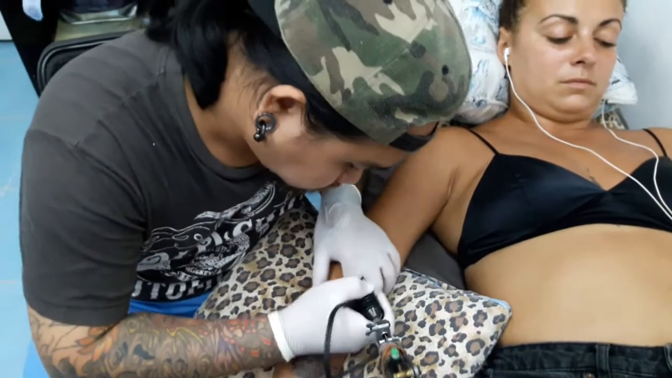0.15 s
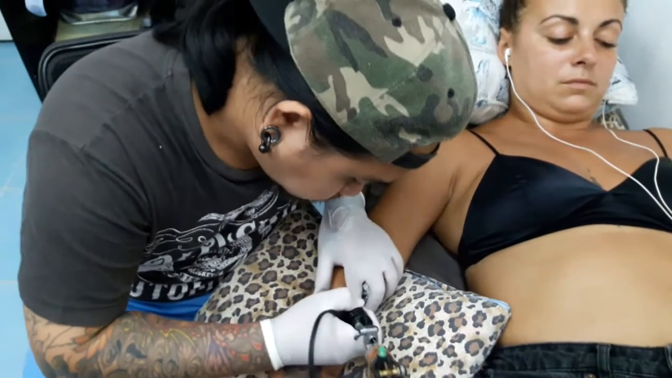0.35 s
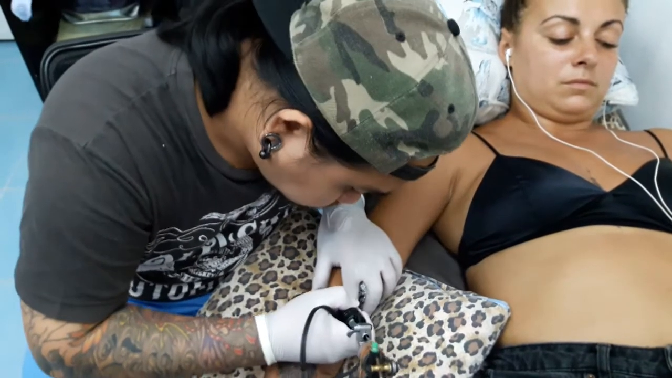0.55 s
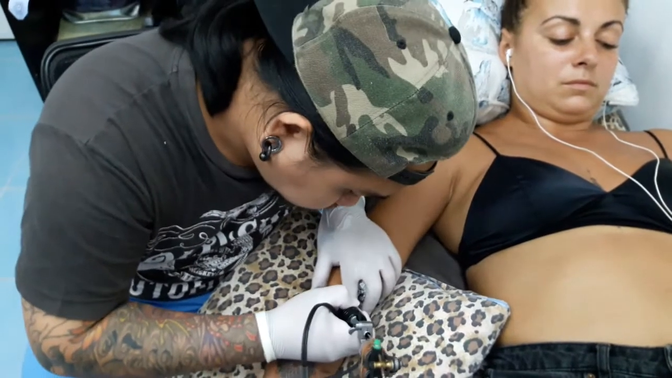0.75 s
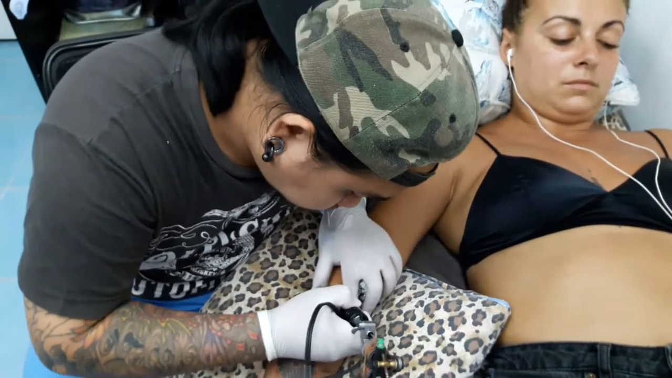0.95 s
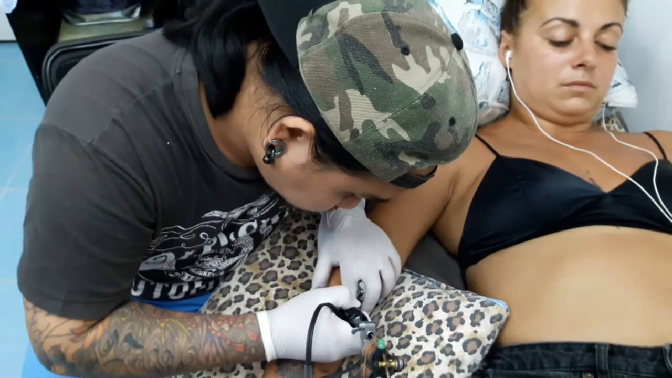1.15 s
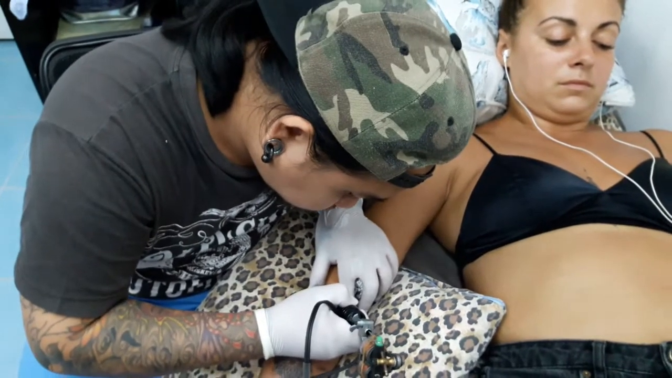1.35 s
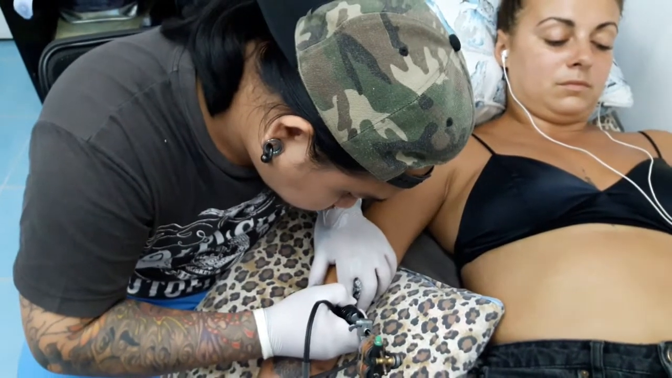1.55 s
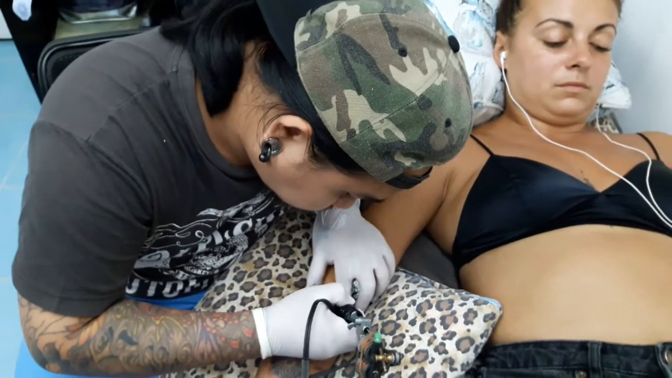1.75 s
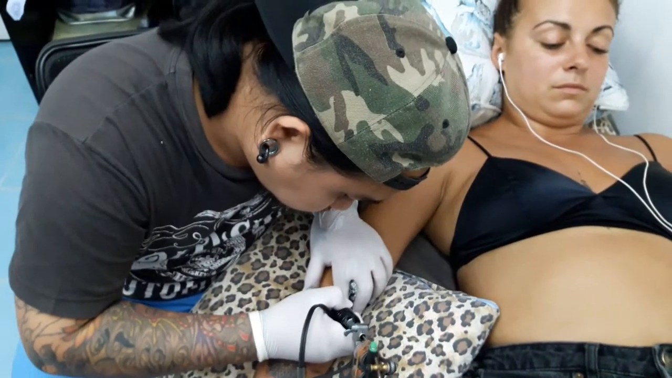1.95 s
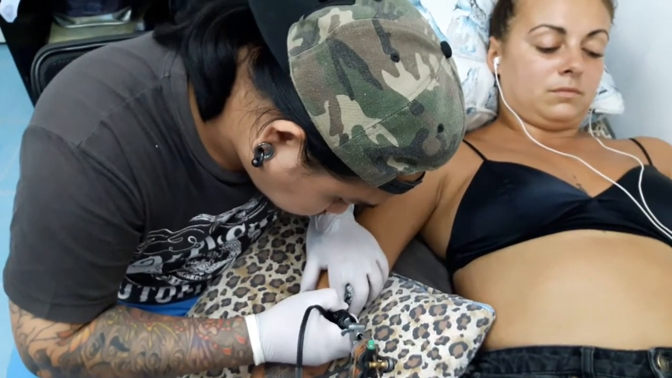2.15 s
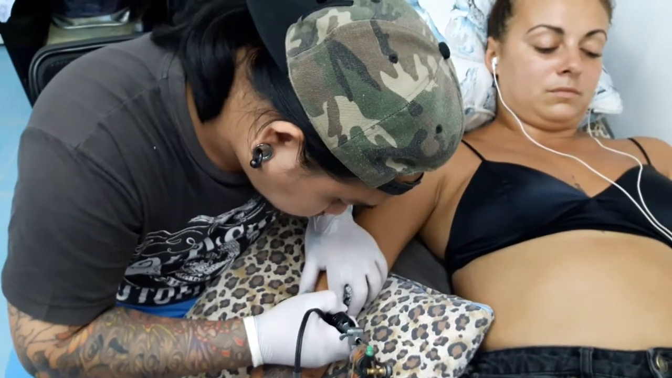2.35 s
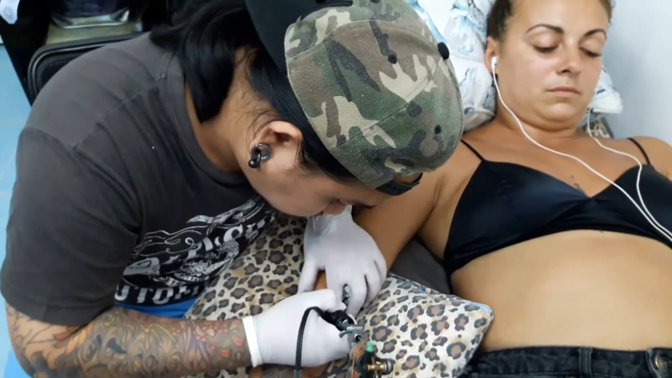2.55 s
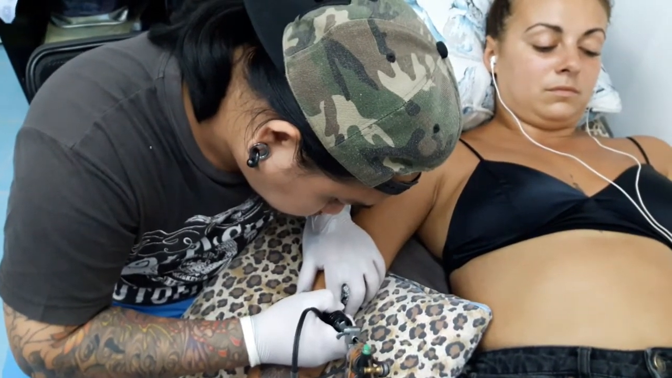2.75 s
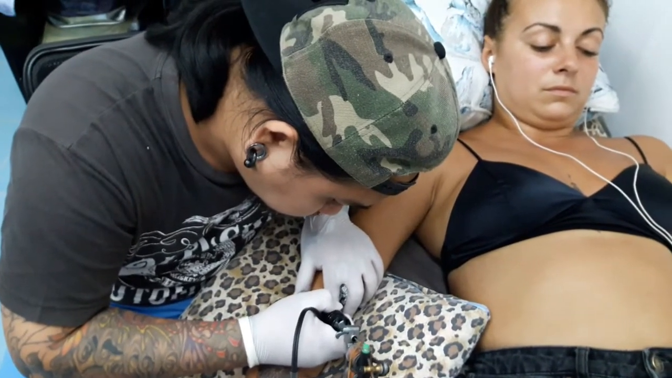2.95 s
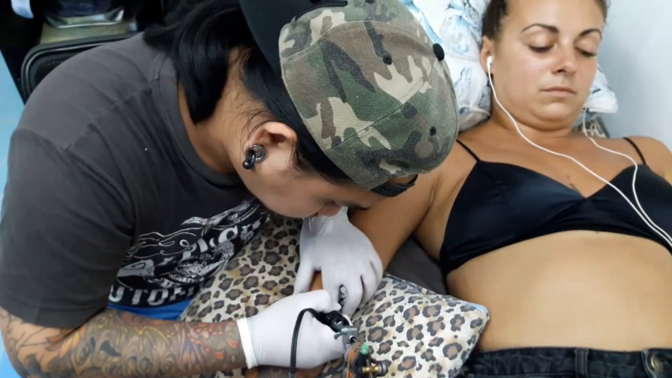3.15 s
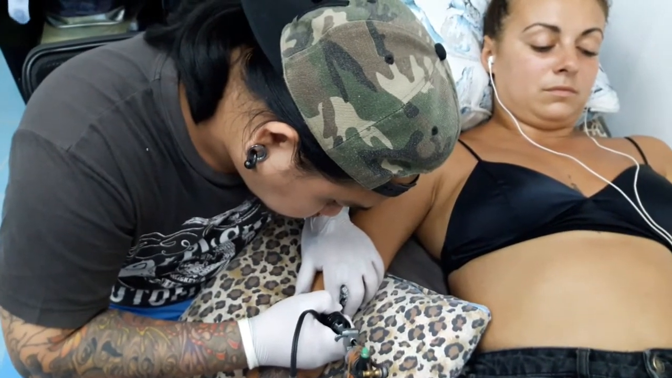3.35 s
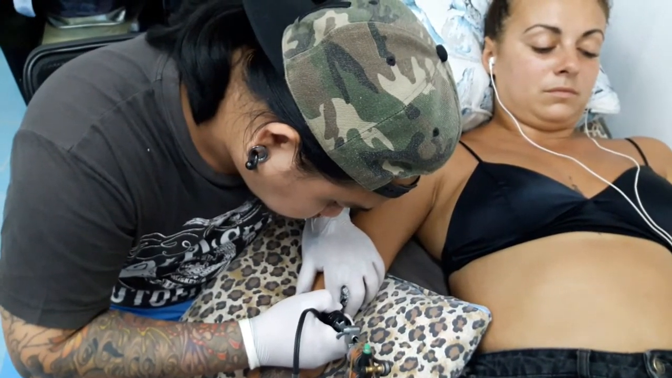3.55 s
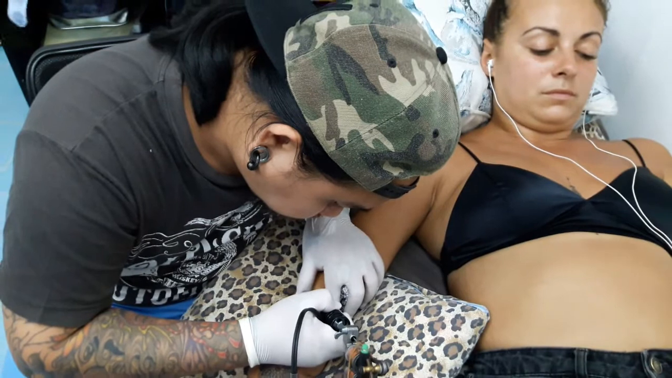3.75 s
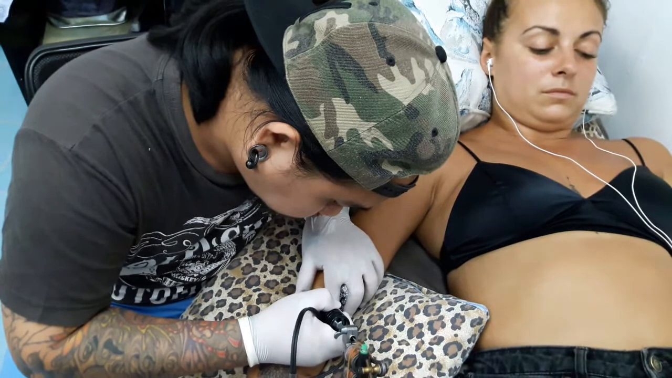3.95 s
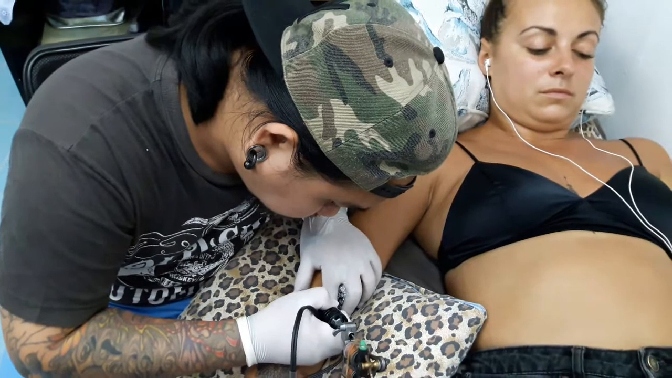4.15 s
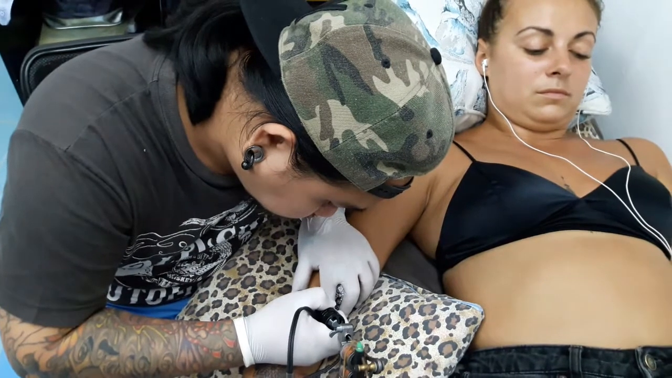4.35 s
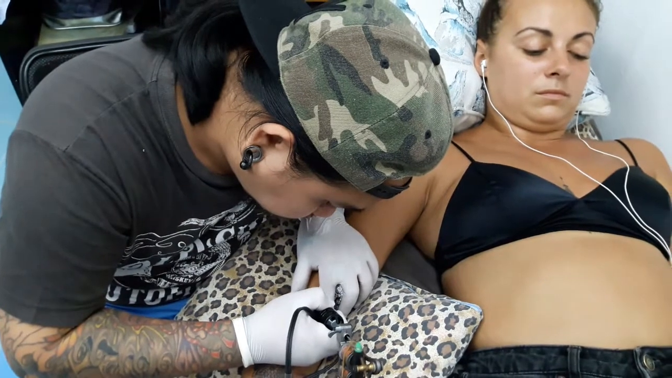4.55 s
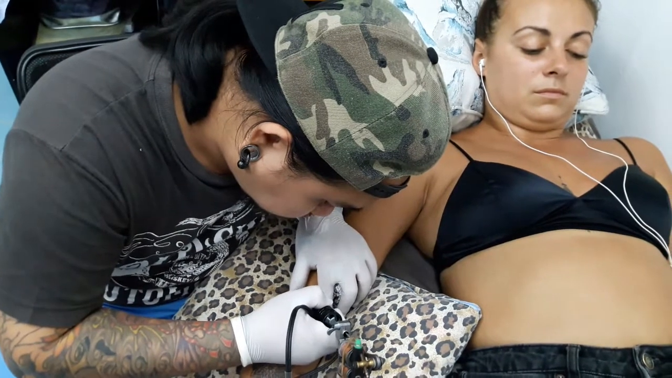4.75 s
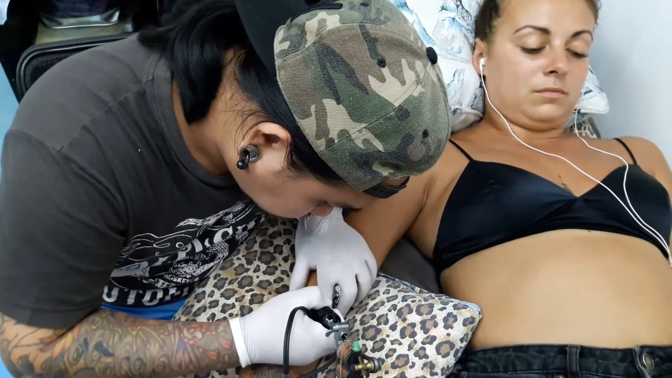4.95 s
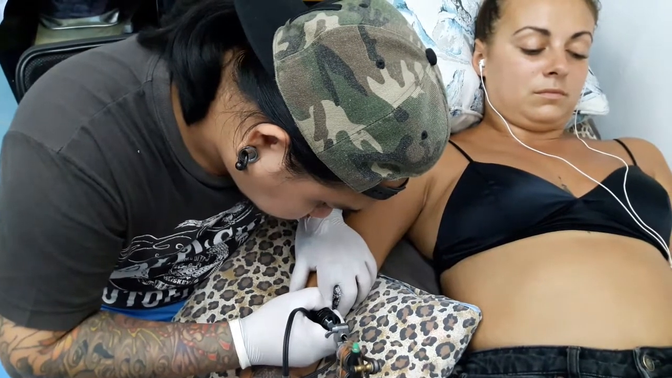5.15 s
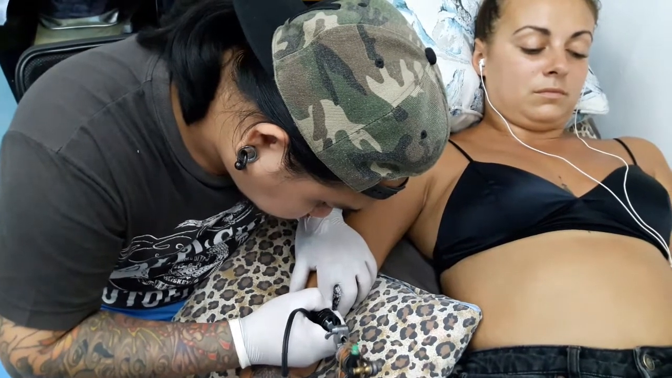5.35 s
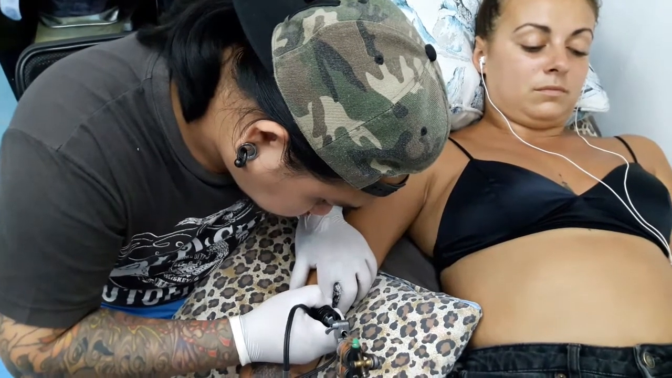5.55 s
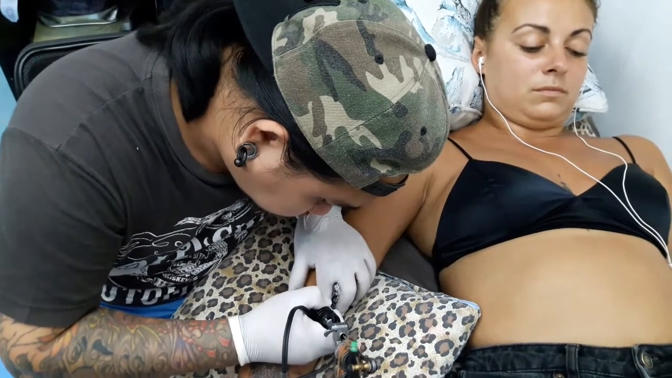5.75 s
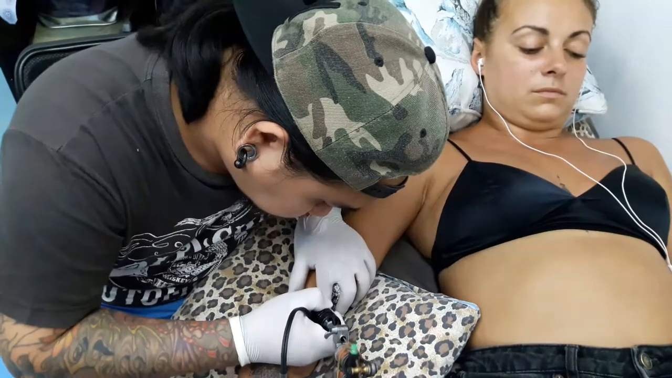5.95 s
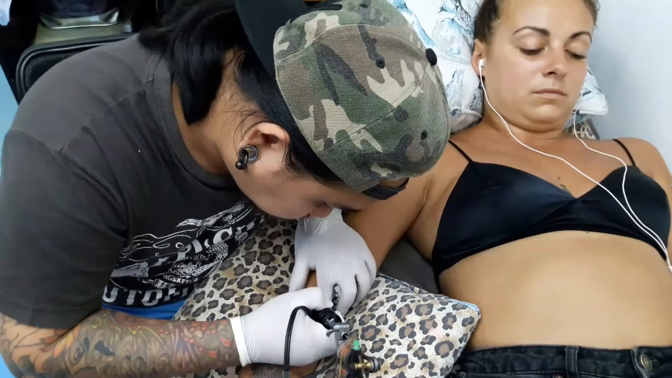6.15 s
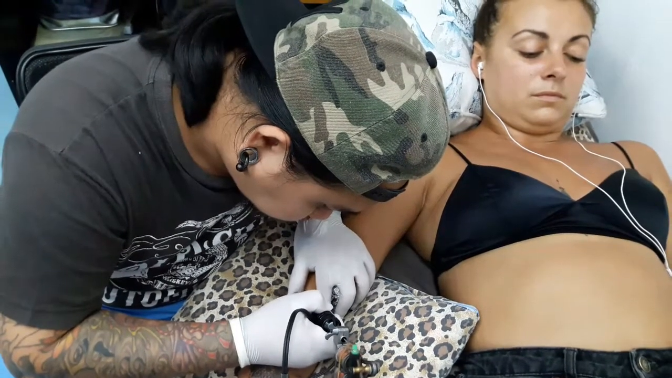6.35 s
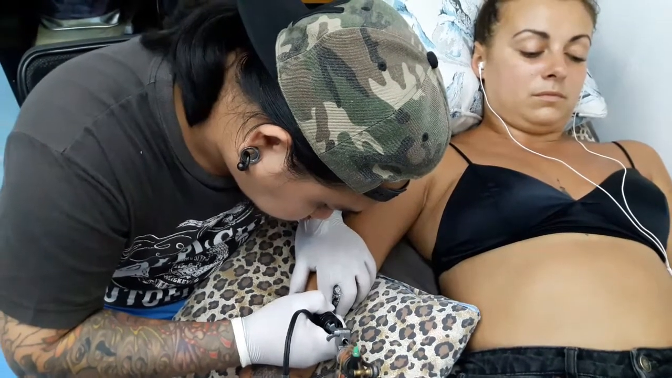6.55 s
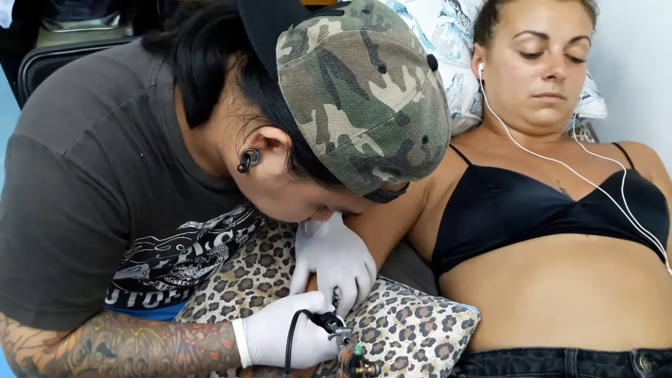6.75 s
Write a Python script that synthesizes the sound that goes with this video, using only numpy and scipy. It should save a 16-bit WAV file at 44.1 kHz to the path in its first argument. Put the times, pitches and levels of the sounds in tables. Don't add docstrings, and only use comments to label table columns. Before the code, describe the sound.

Quiet room air with a low fan first, then an abrupt start: a close tattoo machine, its rapid metal slaps fused into a dry, sizzling buzz with a very strong high edge. The pitch stays nearly level, sagging and recovering minutely while the timbre wavers. A few light rustles and clicks of glove or wrap come through. Small recorder sound, slightly gritty and thin, with short room reflections.

```python
import sys
import numpy as np
from scipy import signal
from scipy.fft import rfft, irfft
from scipy.io import wavfile
from scipy.ndimage import uniform_filter1d

SR = 44100
rng = np.random.default_rng(int(sys.argv[2]) if len(sys.argv) > 2 else 0)


def transcribe(signal):
    frames = np.atleast_2d(signal).T
    limited = np.clip(frames, -1, 1)
    pcm = np.round(limited * 32767).astype(np.int16)
    wavfile.write(sys.argv[1], SR, pcm)


def natural_amplitude(level_db):
    exponent = np.asarray(level_db, float) / 20
    return 10 ** exponent


N = 299880

# time in seconds, rate in strokes per second.
SPEED = [(.3147, 114.74), (.778, 114.73), (.977, 113.92), (1.47, 113.4), (1.825, 114.15), (2.408, 112.33),
         (2.586, 114.11), (2.888, 113.95), (3.7, 113.39), (3.742, 114.43), (4.403, 115.07), (4.579, 113.43),
         (4.695, 114.5), (5.441, 114.31), (5.493, 113.16), (6.209, 112.8), (6.427, 114.39), (6.8, 112.86)]
# start in seconds, level in dB, rise in ms, decay in ms.
RUSTLES = [(.23, -72, 1, 63), (0.299, -35.5, 0.67, 17), (0.77, -24, 1.2, 5.1), (.778, -31, 1, 16),
           (1.621, -26.5, 17, 92), (1.7, -38, 21, 110), (1.786, -23, 1, 5.8), (3.127, -30.5, 1.3, 40),
           (4.038, -22.5, 3.8, 86), (5.358, -20.5, 1, 6.1), (5.371, -27.5, 1.1, 10)]


def rms_one(x):
    return x / np.sqrt(np.mean(x ** 2) + 1e-20)


def in_time(rows):
    s, *columns = np.transpose(rows)
    return [np.interp(np.arange(N) / SR, s, column) for column in columns]


def coloured(x, spectrum, peaks=()):
    hz = np.maximum(np.fft.rfftfreq(N, 1 / SR), 1)
    corner_hz, corner_db = np.transpose(spectrum)
    gain = natural_amplitude(np.interp(np.log(hz), np.log(corner_hz), corner_db))
    lift = 1 + sum(natural_amplitude(db) / (1 + (2 * (hz - f) / width) ** 2) for f, width, db in peaks)
    return rms_one(irfft(rfft(x) * gain * lift, N))


def wander(count, steps):
    return rms_one(uniform_filter1d(rng.standard_normal(count), max(1, round(steps))))


def since_start(fade_s):
    return np.exp(-np.maximum(np.arange(N) / SR - SPEED[0][0], 0) / fade_s)


def room_tone():
    # frequency in Hz, density in dB per Hz.
    hum = [(18, -19), (40, -6.5), (70, -11), (130, -8.5), (280, -8.5), (450, -6.5), (1300, -5),
           (2500, -9.5), (2800, -19.5), (5000, -19), (7700, -31), (8000, -62), (11000, -32), (12900, -32),
           (13300, -69)]
    # frequency in Hz, width in Hz, lift in dB.
    fan = [(136, 26, 9), (204, 24, 7), (278, 16, 8), (340, 40, 5)]
    duck, settle = since_start(.28), since_start(.6)
    level_db = -38.5 - 3 * (1 - duck)
    level_db = level_db - 7.5 * (settle - duck)
    lumps_db = 1.8 * wander(N, steps=900)
    return natural_amplitude(level_db + lumps_db) * coloured(rng.standard_normal(N), hum, fan)


def rustles():
    # frequency in Hz, density in dB per Hz.
    crinkle = [(200, -13), (320, -1), (1000, 1.5), (2300, 2), (4200, -1), (7000, -2.5), (8500, -9.5)]
    t, swell = np.arange(N) / SR, np.zeros(N)
    for s, db, rise_ms, decay_ms in RUSTLES:
        since_ms = np.maximum(t - s, 0) * 1000
        swell += natural_amplitude(db) * (1 - np.exp(-since_ms / rise_ms)) * np.exp(-since_ms / decay_ms)
    grains = rng.standard_normal(N) * natural_amplitude(1.2 * wander(N, steps=35))
    return swell * coloured(grains, crinkle)


def strokes(jitter_ms):
    speed, = in_time(SPEED)
    running = np.arange(N) >= SPEED[0][0] * SR
    turns = np.cumsum(speed * running) / SR
    at = np.interp(np.arange(int(turns[-1]) + 1) + 1e-9, turns, np.arange(N))
    return at - 5 + jitter_ms * SR / 1000 * rng.standard_normal(len(at))


def rattle(slaps, fade_ms, steady):
    # frequency in Hz, density in dB per Hz.
    scrape = [(1200, -27), (2100, -13), (2850, -22), (4250, -11), (5500, -16), (7600, -12), (7950, -25),
              (8700, -22), (10350, -8), (10800, -1), (12500, -2), (13200, -14), (14400, -8), (15800, -20)]
    kicks = np.zeros(N)
    kicks[np.clip(slaps.astype(int), 0, N - 1)] = 1
    shake = signal.lfilter([1], [1, -np.exp(-1000 / (fade_ms * SR))], kicks)
    running = np.arange(N) > slaps[0]
    return rms_one(coloured(rng.standard_normal(N), scrape) * (steady + shake) * running)


def struck(modes, slaps, shifts, rise_ms, loose_db, loose_rad, slack_ms, creep_db, spring_ms):
    rebound_ms = 1.1
    out, count = np.zeros(N), len(slaps)
    slack = slack_ms * rng.standard_normal((count, 3)) * [0, 1, 2]
    late_ms = [0, rebound_ms, spring_ms] + slack
    at = np.clip(slaps[:, None] + late_ms * SR / 1000, 0, N - 1)
    whole = at.astype(int)
    for hz, t60_ms, side, *contact_db in modes:
        w = 2 * np.pi * hz / SR
        fast = rng.standard_normal((2, count, 3))
        creep = wander(count, steps=60)[:, None]
        db = contact_db + loose_db * fast[0] + creep_db * creep
        db += sum(shift_db[whole] for low, high, shift_db in shifts if low < hz < high)
        phase = loose_rad * fast[1] - w * (at - whole)
        clicks = np.full(N, 1e-18, complex)
        np.add.at(clicks, whole, side * natural_amplitude(db) * np.exp(1j * phase))
        ring = natural_amplitude(-6e4 / (t60_ms * SR))
        soft = np.exp(-1000 / (rise_ms * SR))
        turning = np.exp(1j * w)
        pushed = signal.lfilter([1 - soft], [1, -soft * turning], clicks)
        out += signal.lfilter([1], [1, -ring * turning], pushed).imag
    return rms_one(out)


def shaded(x, cup):
    open_dip_hz, cupped_dip_hz, width_hz, depth = 6300, 5500, 500, .6
    for hz, share in (open_dip_hz, -cup), (cupped_dip_hz, cup):
        band = signal.lfilter(*signal.iirpeak(hz, hz / width_hz, SR), x)
        x = x - np.clip(depth * share, 0, 1) * band
    return x


def machine():
    # time in seconds, blow in dB, turn of the grip from -1 (frame ring near
    # 4 kHz and highest bar modes forward) to +1 (lower bar modes and rest of frame).
    effort = [
        (.31, -18, 0.76),
        (.5, -14, 0.21),
        (1.4, -13.5, -0.6),
        (1.9, -14, 1),
        (2.2, -14, 0.71),
        (3.9, -13, -0.57),
        (4.4, -14, 0.52),
        (5.95, -12.5, 0.48),
        (6.1, -13.5, 0.86),
        (6.8, -14, 0.57),
    ]
    # time in seconds, closure from -1 (open) to +1 (cupped).
    fingers = [(.31, -0.052), (.75, 0.0015), (2.2, -0.16), (2.5, -0.23), (3.0, 0.18), (3.3, 0.062),
               (3.7, 0.77), (4.3, 0.7), (4.9, 0.48), (5.4, 0.43), (5.7, -0.12), (6.1, 0.21), (6.4, 0.38),
               (6.8, -0.38)]
    # frequency in Hz, t60 in ms, side facing the microphone (+-1),
    # then slap, rebound and spring contact in dB.
    bar_modes = [(10790, 14, -1, -15, -36, -27), (11375, 11.5, 1, -17, -36, -30),
                 (11850, 12, 1, -21, -38, -36), (12300, 4, 1, -6.5, -30, -24),
                 (12650, 9, -1, -19.5, -34, -32), (13100, 9, -1, -30, -38, -36),
                 (13900, 4.5, -1, -20, -32, -30), (14400, 9, 1, -24, -36, -35),
                 (15080, 5, -1, -29, -36, -38)]
    # frequency in Hz, t60 in ms, side facing the microphone (+-1),
    # then slap, rebound and spring contact in dB.
    frame_modes = [(1945, 26, 1, -17, -11.5, -26), (2065, 30, 1, -17, -12, -26),
                   (2280, 26, 1, -16, -11, -26), (2390, 30, 1, -9.5, -4, -24), (2510, 28, 1, -18, -14, -26),
                   (3090, 12, 1, -17, -30, -25), (3200, 14, 1, -13, -28, -21), (3340, 12, 1, -8, -24, -15),
                   (3450, 12, 1, -12, -26, -20), (3890, 32, 1, -15, -8.5, -11),
                   (4085, 26, 1, -13, -3.5, -6.5), (4220, 22, 1, -15, -7, -10), (4310, 22, 1, -14, -7, -9),
                   (4450, 20, 1, -20, -14, -16), (4790, 20, 1, -17, -13, -15),
                   (5550, 18, -1, -18, -16, -21), (6120, 22, 1, -18, -15, -21),
                   (6610, 22, -1, -16, -13, -19), (6860, 20, 1, -20, -17, -23),
                   (7500, 18, 1, -15, -13, -20), (8270, 14, -1, -26, -26, -32), (9400, 6, 1, -15, -20, -22)]
    blow_db, turn = in_time(effort)
    cup, = in_time(fingers)
    free = since_start(.11)
    slaps = strokes(jitter_ms=.025)

    pair_db = 3 * turn + 4 * free + .19
    top_db = -3 * turn + .5
    knock_db = np.full(N, -.5)
    whine_db = -3 * turn - 3.8 * cup + .17
    loose_knock_db = 11 * since_start(.22)
    tilt_db = 4 * since_start(.13)
    frame_db = -18 + 2.64 * turn + 6 * free
    # band from Hz, to Hz, shift in dB over time.
    shifts = [(10500, 11600, pair_db), (13500, 16000, top_db),
              (1800, 2600, knock_db), (2450, 2600, loose_knock_db),
              (3700, 4800, whine_db),
              (1800, 2150, -tilt_db), (4000, 4200, tilt_db), (4250, 4800, -tilt_db),
              (3000, 3600, 3 * cup), (6000, 7000, 7.5 * cup)]

    bar = struck(bar_modes, slaps, shifts, rise_ms=.09, loose_db=.55, loose_rad=.2,
                 slack_ms=.03, creep_db=.55, spring_ms=7.0)
    frame = struck(frame_modes, slaps, shifts, rise_ms=.25, loose_db=1.6, loose_rad=.13,
                   slack_ms=.014, creep_db=2.6, spring_ms=6.4)
    bar = signal.sosfiltfilt(signal.butter(5, 10350, "high", fs=SR, output="sos"), bar)
    frame = signal.sosfiltfilt(signal.butter(4, 1680, "high", fs=SR, output="sos"), frame)
    valley_hz, valley_width_hz = 2767, 650
    valley = signal.lfilter(*signal.iirpeak(valley_hz, valley_hz / valley_width_hz, SR), frame)
    frame = frame - .5 * valley
    needle = natural_amplitude(-11) * rattle(slaps, fade_ms=1.5, steady=.42)
    return natural_amplitude(blow_db) * (natural_amplitude(-3.5) * bar + shaded(natural_amplitude(frame_db) * frame + needle, cup))


def room(x):
    t60_s = .3
    t = np.arange(SR // 2) / SR
    tail = rng.standard_normal(len(t)) * natural_amplitude(-60 * t / t60_s) * (t > .004)
    return signal.fftconvolve(x, tail / np.sqrt(np.sum(tail ** 2)))[:N]


def scene():
    near = machine() + rustles()
    return (near + natural_amplitude(-14) * room(near) + room_tone())[None]


def thinned(x, size, hold, mood_db, shift_db):
    # frequency in Hz, level in dB.
    threshold = [(30, -19), (300, -15.5), (500, -12), (1500, -13), (2000, -22), (2850, -16), (4000, -22),
                 (5800, -14.5), (7500, -21), (8300, -16), (10000, -18), (10600, -22), (15500, -17)]
    window = np.sin(np.pi * (np.arange(size) + .5) / size)
    hz, _, lines = signal.stft(x, SR, window, size, size // 2)
    bright_power = np.mean(np.abs(lines[hz > 9000]) ** 2, axis=0)
    buzz = np.sqrt(uniform_filter1d(bright_power, size=4096 // size + 1))
    mood = np.clip(rng.standard_normal((30, len(buzz))), -2, .9)
    mood = np.repeat(mood, hold, axis=1)[(hz // 800).astype(int), :len(buzz)]
    corner_hz, corner_db = np.transpose(threshold)
    bar_db = np.interp(np.log(hz + 1), np.log(corner_hz), corner_db)
    kept = np.abs(lines) > buzz * natural_amplitude(bar_db[:, None] + shift_db + mood_db * mood)
    return signal.istft(lines * kept, SR, window, size, size // 2)[1][:N]


def band_limit(x):
    return signal.sosfilt(signal.butter(12, 15970, fs=SR, output="sos"), x)


def record(dry):
    rounded = np.tanh(dry[0] / 1.1) * 1.1
    long = thinned(rounded, size=2048, hold=1, mood_db=3.5, shift_db=3.5)
    short = thinned(rounded, size=256, hold=3, mood_db=6., shift_db=-.3)
    chosen = np.repeat(rng.random(N // 1024 + 1) < .62, 1024)[:N]
    for s, _, _, decay_ms in RUSTLES:
        chosen[int(s * SR) - 512:int(s * SR) + 1024] |= decay_ms < 30
    blend = uniform_filter1d(chosen * 1., size=128)
    top = signal.ellip(12, .5, 60, 15830, fs=SR, output="sos")
    mix = signal.sosfilt(top, blend * short + (1 - blend) * long)
    return band_limit(mix[None])


dry = scene()
out = record(dry)
transcribe(out)
```